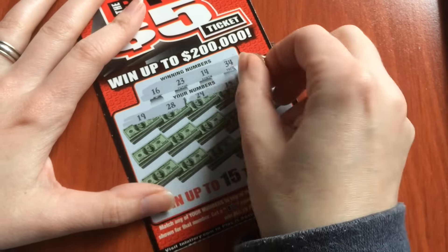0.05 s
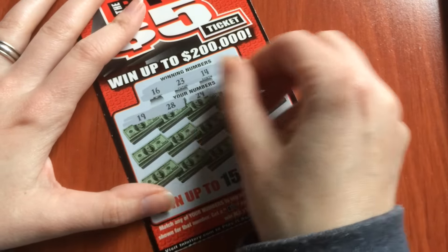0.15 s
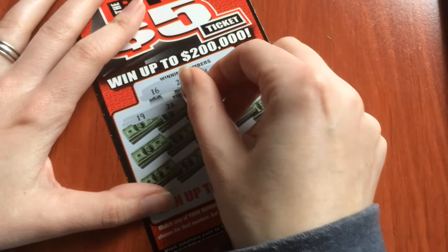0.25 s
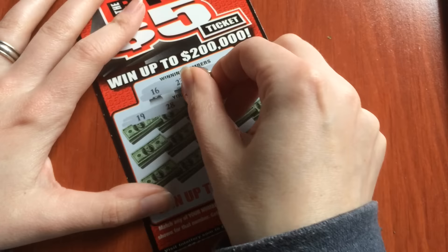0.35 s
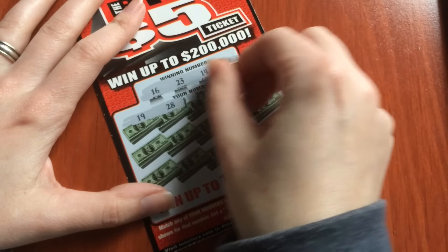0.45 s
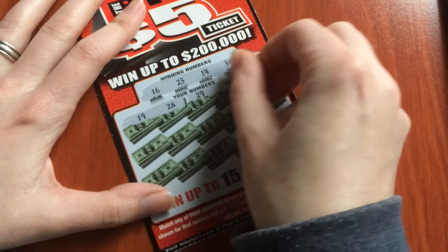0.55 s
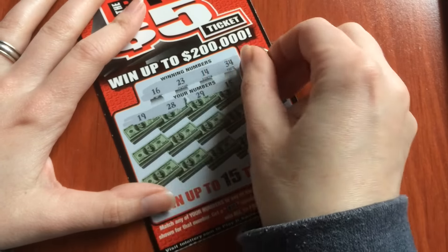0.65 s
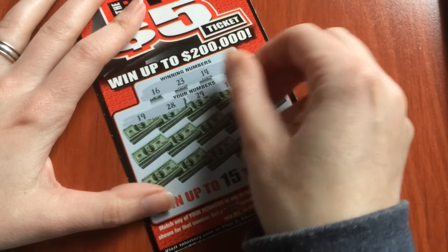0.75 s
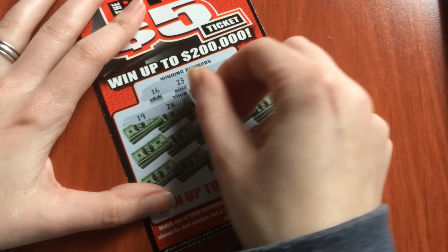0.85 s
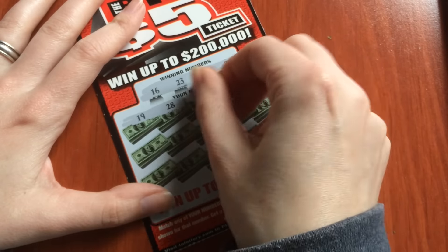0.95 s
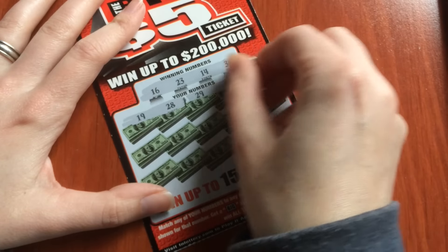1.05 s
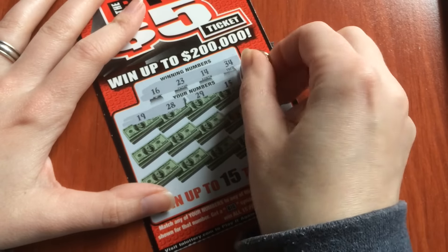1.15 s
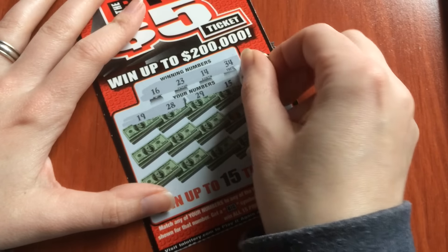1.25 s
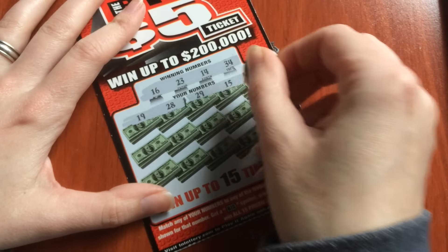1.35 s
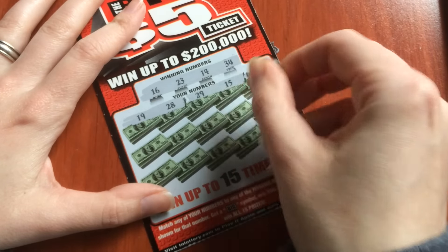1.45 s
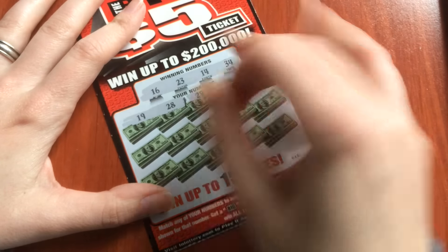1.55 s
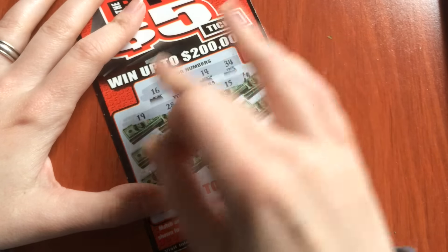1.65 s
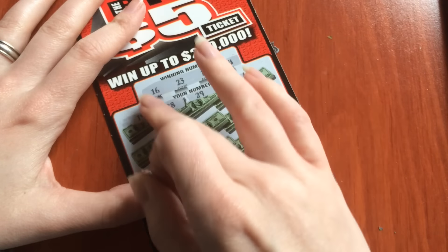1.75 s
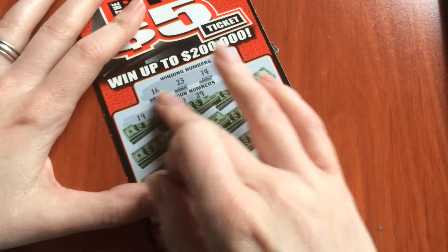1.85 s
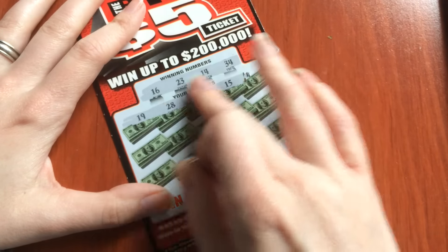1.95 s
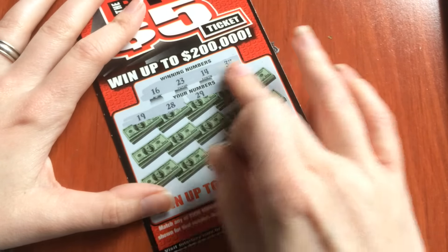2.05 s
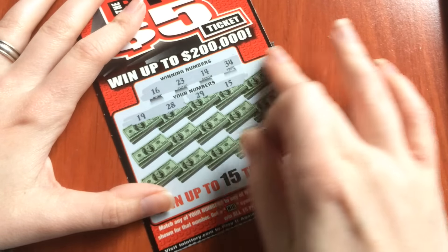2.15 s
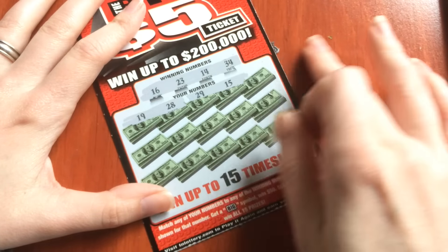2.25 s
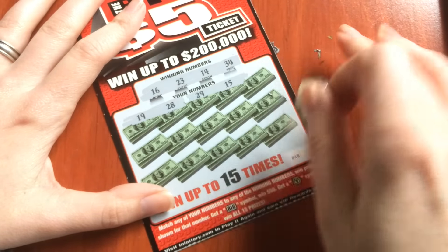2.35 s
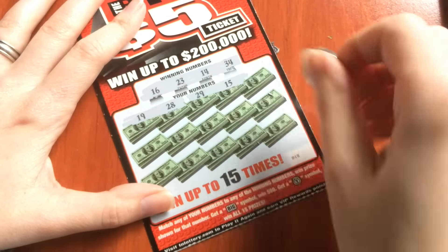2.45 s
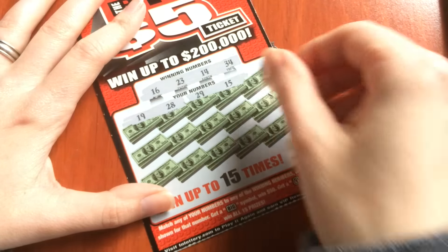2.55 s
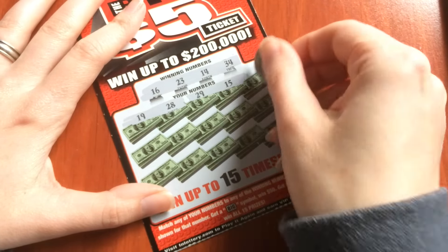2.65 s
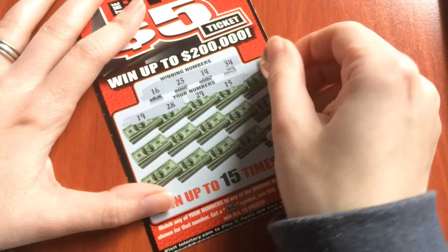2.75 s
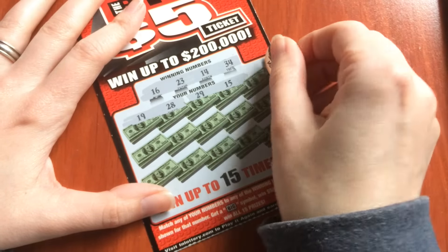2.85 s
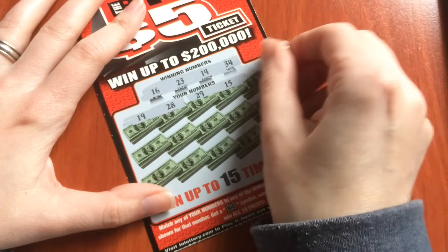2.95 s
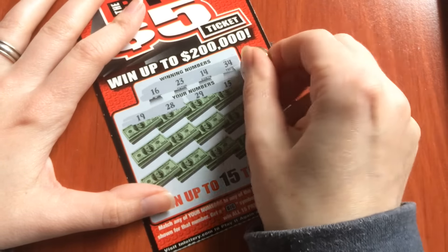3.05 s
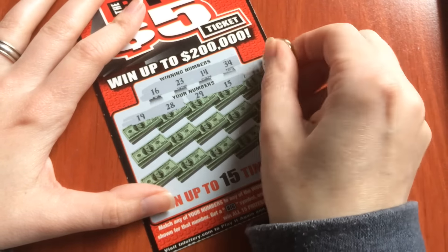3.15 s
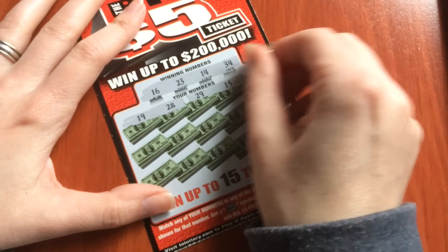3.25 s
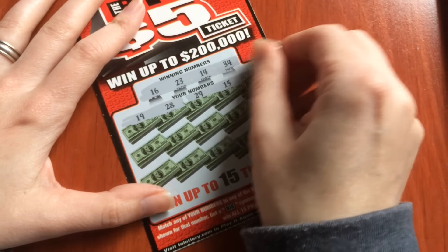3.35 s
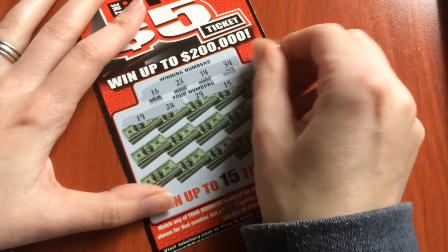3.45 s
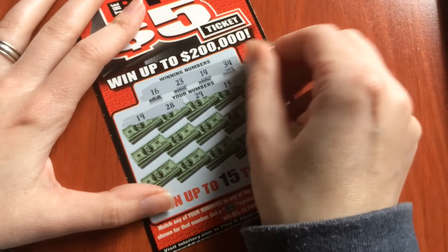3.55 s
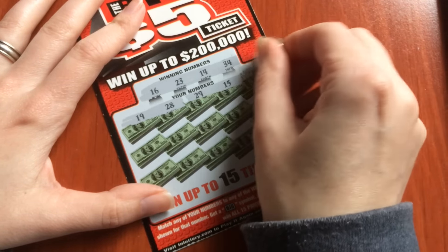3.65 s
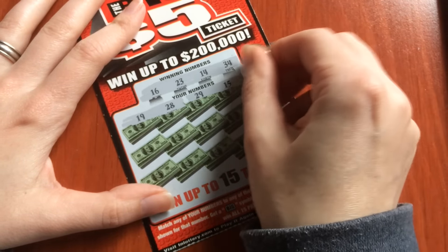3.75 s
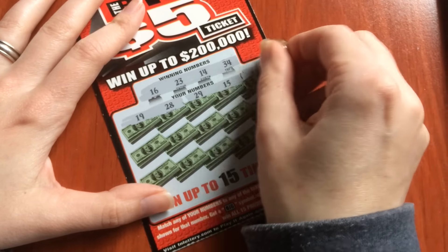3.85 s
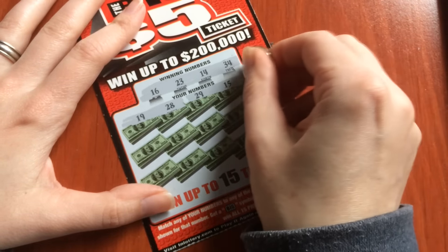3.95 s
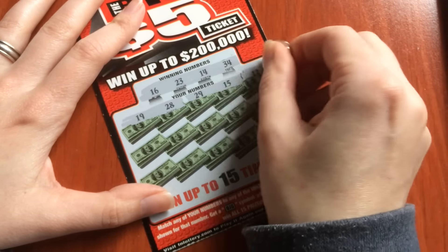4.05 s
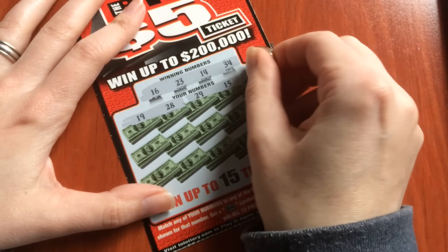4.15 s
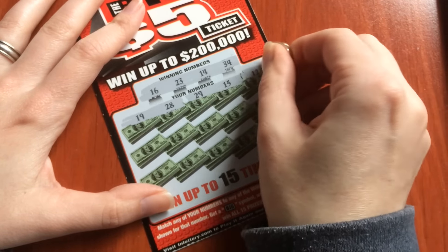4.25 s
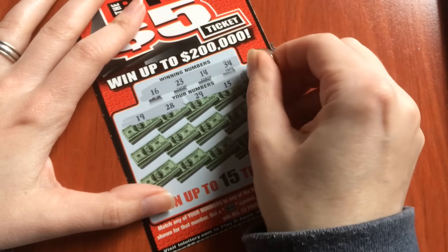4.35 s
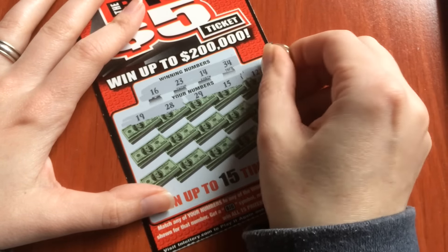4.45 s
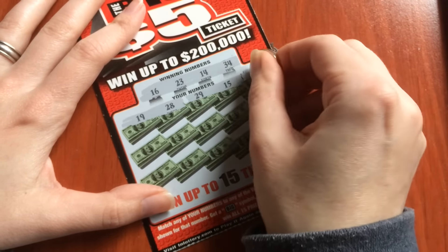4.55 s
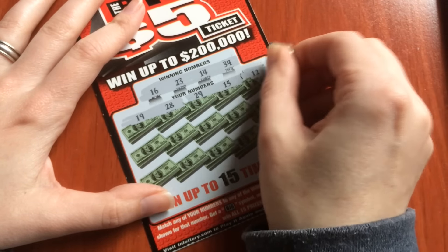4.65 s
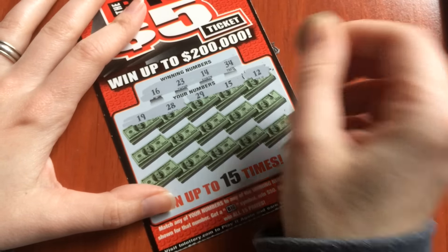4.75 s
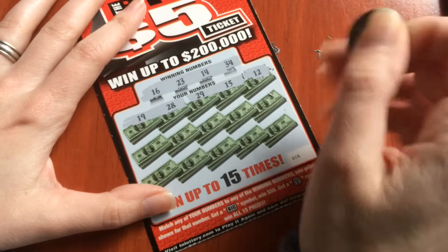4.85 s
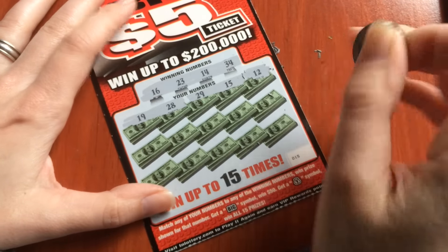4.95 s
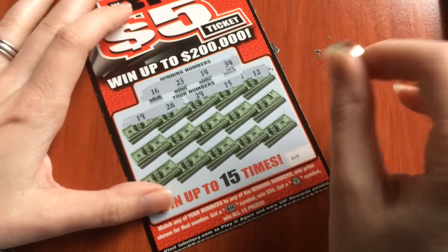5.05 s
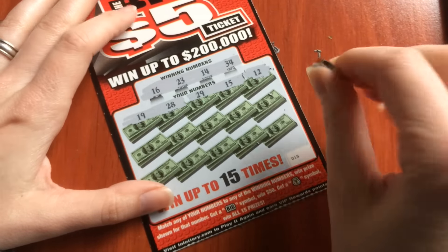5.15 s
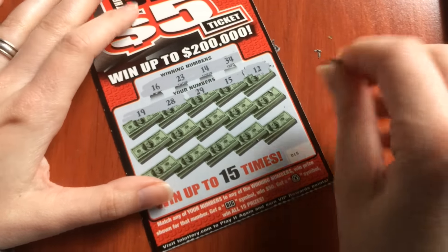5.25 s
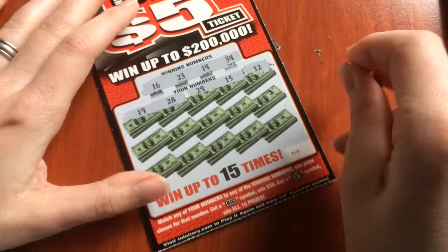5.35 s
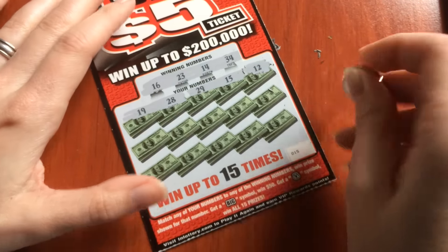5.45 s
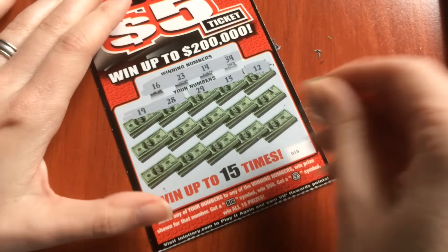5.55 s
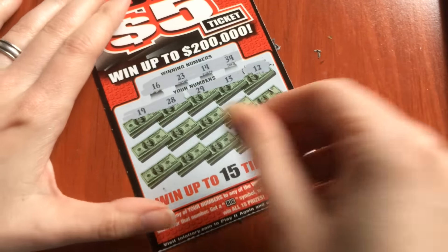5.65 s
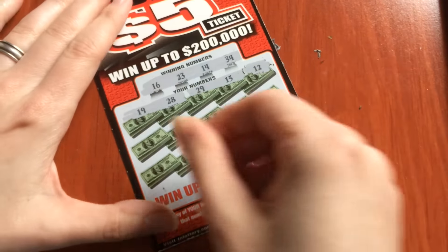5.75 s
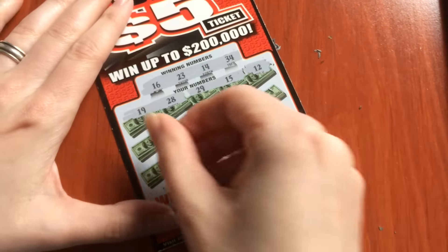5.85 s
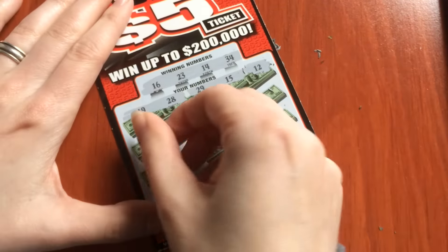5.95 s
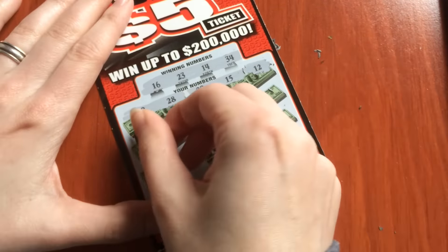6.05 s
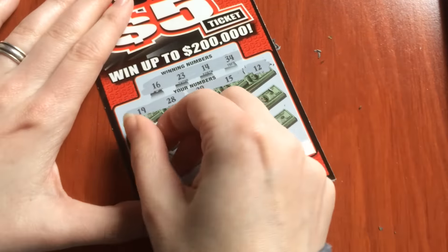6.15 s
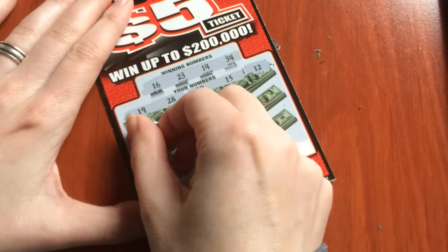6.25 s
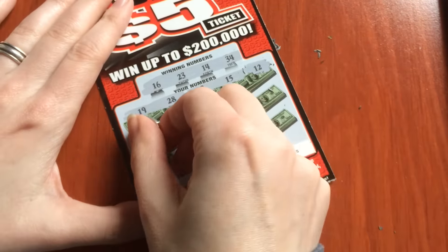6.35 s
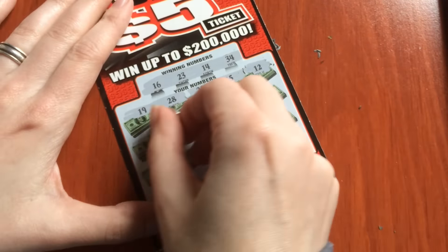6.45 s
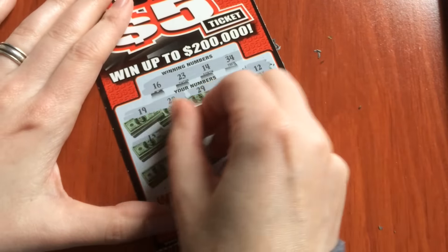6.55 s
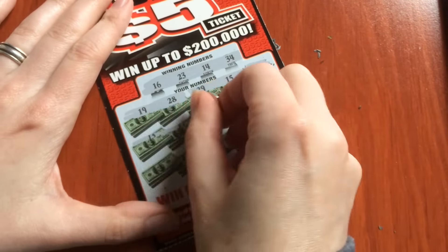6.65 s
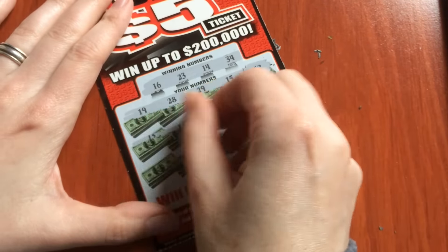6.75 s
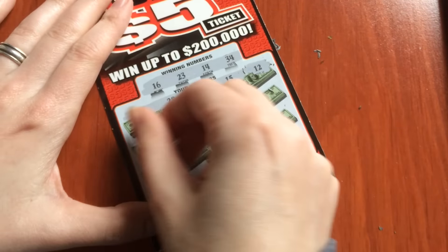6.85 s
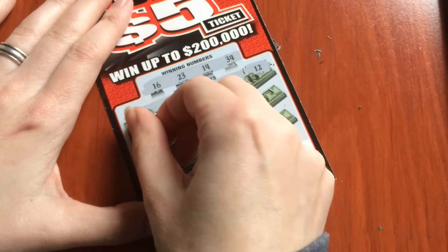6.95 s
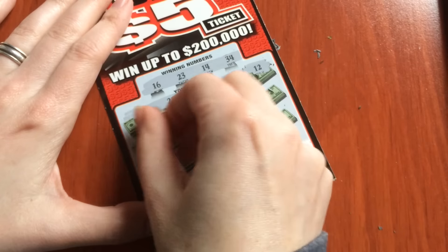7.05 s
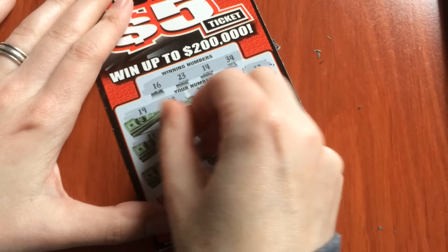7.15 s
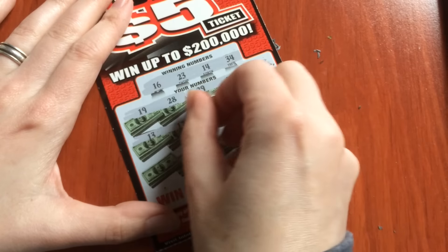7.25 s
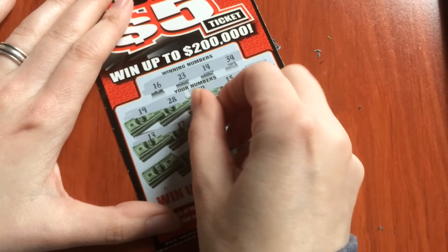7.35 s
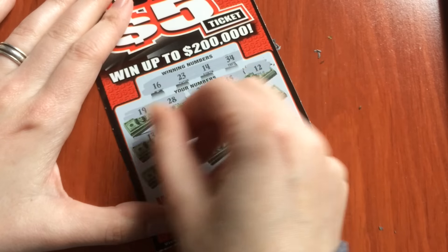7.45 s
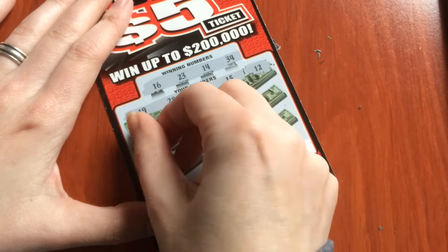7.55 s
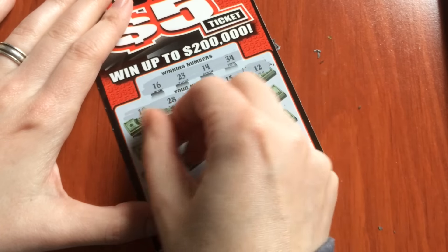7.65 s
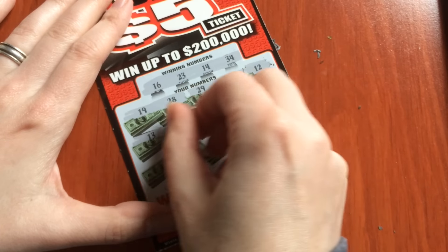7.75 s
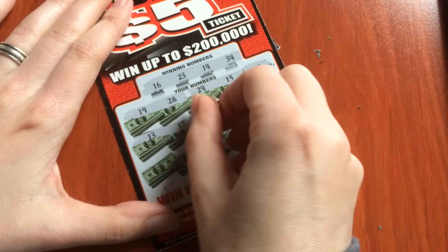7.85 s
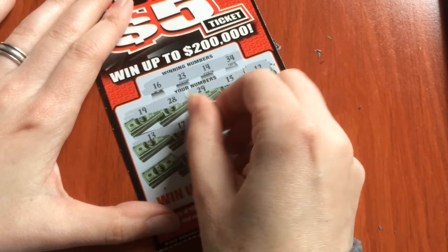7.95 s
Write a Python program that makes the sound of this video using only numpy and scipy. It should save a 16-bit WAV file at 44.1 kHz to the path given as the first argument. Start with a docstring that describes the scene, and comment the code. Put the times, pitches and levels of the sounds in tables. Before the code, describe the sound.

Dry, grainy scratching heard from very near: separate coin strokes on thin card, resonating in the wooden table beneath. Fingers softly sweep crumbs away with tiny nail ticks, then about sixteen rapid alternating strokes run together for under two seconds. Light clicks and a soft thump lead to three slower, brighter scrapes. The short dull echo of a furnished room and a faint wavering rumble surround it.

```python
"""A coin's edge scratches the coating off a card ticket on a wooden table by stick-slip friction: three slow
strokes, a quick back-and-forth run, then three more slow strokes. Random fractures of the coating, filtered into
bands, excite the resonances of table, card and coin. Filtered impulses make the knocks, noise bursts and damped
sines the light ticks, shaped grain noise the brushing fingers, and band noise the rub of the heel of the hand.
Decaying noise forms the room's short echo; coloured noise forms its quiet rumble."""
import sys
import numpy as np
from scipy import signal
from scipy.fft import rfft, irfft, next_fast_len
from scipy.io import wavfile
from scipy.ndimage import map_coordinates

SR = 44100
rng = np.random.default_rng(int(sys.argv[2]) if len(sys.argv) > 2 else 0)


def store_wav(level_fs):
    """Save 16-bit WAV to argv[1]."""
    pcm = np.round(np.clip(np.atleast_2d(level_fs), -1, 1) * 32767)
    wavfile.write(sys.argv[1], SR, pcm.T.astype(np.int16))


N = 353505
TIME = np.arange(N) / SR  # seconds

# Slow strokes of the coin. Each row: row of the ticket, start in s, fastest moment in s, end in s, attack in s,
# release in s, level in dB, then drag (bass), bite (treble) and hiss (top) at full speed, in dB relative to
# the middle band, and swell (rise in level towards the fastest moment) in dB.
SLOW_STROKES = [("top", -0.12, 0.011, 0.17, 0.02, 0.062, -39.5, -10.5, -0.56, -19.5, 1.7),
                ("top", 0.491, 0.52, 0.772, 0.0084, 0.073, -40.5, -10.5, 1.4, -19, 6.1),
                ("top", 1.059, 1.145, 1.303, 0.028, 0.043, -48.5, -9, -10.5, -29, 8.3),
                ("lower", 6.488, 6.62, 6.815, 0.0029, 0.087, -39, -12.5, 4.4, -16.5, 0),
                ("lower", 7.125, 7.3, 7.448, 0.025, 0.064, -42.5, -10, 3.1, -17.5, 0.56),
                ("lower", 7.73, 7.925, 8.04, 0.039, 0.074, -38, -12.5, -3.2, -21.5, 11.6)]
# Places where a slow stroke skids over a thin patch (quieter) or catches on a thick one (louder).
# Each row: centre in s, half length in s, change of level in dB, change of bite and hiss in dB.
COATING_PATCHES = [(0.518, 0.013, 1.5, 1.5), (0.635, 0.018, -3.5, 2), (1.135, 0.02, 3.5, -2),
                   (6.601, 0.021, -7, -5), (6.744, 0.015, 3, -5.5), (7.405, 0.011, 7, -9.5),
                   (7.858, 0.018, -4.5, 2.5)]
# Quick strokes at the corner, dull pushes and bright pulls in turn. Each row: start in s, fastest moment in s,
# end in s, level in dB, drag in dB and hiss in dB, both relative to the middle band.
QUICK_STROKES = [(3.053, 3.073, 3.178, -36.3, -7.5, -23), (3.194, 3.228, 3.26, -37, -12, -25),
                 (3.315, 3.368, 3.406, -37, -5.5, -25), (3.439, 3.481, 3.516, -40, -13, -26.5),
                 (3.537, 3.6, 3.635, -40, -3.5, -22), (3.656, 3.716, 3.73, -46.5, -8, -33),
                 (3.764, 3.808, 3.842, -40, -0.5, -39), (3.875, 3.893, 3.947, -46, -10.5, -35),
                 (3.972, 4.016, 4.05, -39.5, -0.5, -33), (4.079, 4.121, 4.15, -38, -13.5, -23.5),
                 (4.186, 4.204, 4.25, -39.5, -0.5, -33), (4.292, 4.317, 4.362, -38.5, -13, -26.5),
                 (4.394, 4.446, 4.474, -41.5, -3.5, -23.5), (4.505, 4.532, 4.57, -37, -10, -25),
                 (4.6, 4.634, 4.67, -44, 0, -26), (4.7, 4.726, 4.779, -42.5, -11, -28)]
# Ringing of the wooden table top. Each row: frequency in Hz, width in Hz before the hand's damping is added,
# then level in dB with the coin on the top row, at the corner and on the lower row.
WOOD_MODES = [(208, 33, -16, -16, -14), (343, 50, -20, -16, -16), (458, 18, -13, -5, -11),
              (494, 25, -17, -13, -15), (600, 47, -11, -6, -12), (728, 54, -15, -8, -16),
              (800, 54, -20, -24, -13), (948, 54, -16, -13, -14), (1087, 54, -6, 0, -10),
              (1164, 54, -20, -17, -10), (1265, 35, -9, -5, -10), (1430, 54, -3, -5, 0),
              (1462, 22, -1, -7, -2), (1567, 40, 0, -7, -4), (1663, 30, -7, -9, -7),
              (1722, 37, -4, -27, -4), (1787, 30, -6, -12, -16), (1849, 54, -10, -17, -4)]
# Higher resonances of the card and the pinched coin. Each row: the same columns as for the wood.
CARD_MODES = [(2002, 65, -9, -19, -4), (2108, 45, -5.5, -14, -22), (2185, 52, -15, -55, -5.5),
              (2350, 83, -5.5, -17, -3.5), (2520, 103, -10.5, -18, -29), (2673, 114, -10, -41, -3.5),
              (2880, 97, -14.5, -28, -4), (3017, 85, -21, -20.5, -6.5), (3226, 83, -19, -40, -7.5),
              (3470, 260, -19, -31.5, -17), (3817, 225, -16.5, -28.5, -14), (4330, 175, -24, -29.5, -16),
              (4520, 104, -29, -35, -15.5), (4991, 87, -25.5, -38, -21.5), (5474, 170, -31, -34.5, -24),
              (6300, 540, -32, -41.5, -28.5), (7520, 630, -35.5, -46, -32), (8240, 750, -34.5, -52, -29),
              (9070, 415, -42, -44.5, -41), (9700, 550, -35, -49, -39), (11000, 1200, -42, -43.5, -35),
              (12900, 1300, -47, -55, -35.5), (14400, 994, -41, -51, -41)]
# Landings of coin or fingers on the card. Each row: time in s, peak level in dB, contact cut-off in Hz,
# settling time constant in s.
KNOCKS = [(0.216, -51, 850, 0.021), (0.351, -53, 1000, 0.014), (0.3749, -25, 700, 0.0026),
          (0.803, -53.5, 453, 0.0097), (0.989, -28, 726, 0.0022), (2.166, -60, 597, 0.014),
          (2.905, -53, 414, 0.018), (6.235, -44, 397, 0.024), (6.845, -53, 460, 0.008),
          (6.999, -54.5, 382, 0.0071), (7.041, -38, 350, 0.01), (7.634, -49, 377, .03)]
# Light contacts of coin edge and nails. Each row: time in s, peak level in dB, ping frequency in Hz,
# ping level in dB relative to the crack.
TICKS = [(0.374, -45.5, 5440, -9), (0.9888, -44, 5860, -21), (1.8805, -46, 6800, 2),
         (2.004, -45, 5000, -13), (2.167, -37, 11400, -5), (2.177, -37, 2620, -2.5),
         (2.723, -52.5, 6030, -7), (2.874, -45.5, 6900, -19), (5.0206, -41, 8170, 2),
         (5.1491, -51, 7000, -16), (5.21, -52, 7000, -16), (5.434, -43, 4100, -1), (6.222, -38, 5600, -11),
         (7.0375, -36, 6750, -5), (7.626, -44.5, 8600, -6)]
# Fingers sweeping over the card. Each row: start in s, fastest moment in s, end in s, level in dB,
# pressure (body relative to the light hiss) in dB.
FINGER_SWEEPS = [(1.864, 2.16, 2.39, -62, -13), (1.993, 2.017, 2.16, -59.5, -1),
                 (2.154, 2.172, 2.305, -55, -7.5), (2.48, 2.568, 2.7, -76.5, -13),
                 (4.86, 4.92, 4.99, -67.5, -12), (5.68, 5.744, 5.82, -73, -17)]
# Spectrum of lightly sliding skin. Each row: frequency in Hz, density in dB per Hz.
LIGHT_SKIN_SPECTRUM = [(2500, -21), (5000, -11), (8000, -4), (12500, 1), (15500, -3.5)]
# Spectrum of pressed skin. Each row: frequency in Hz, density in dB per Hz.
PRESSED_SKIN_SPECTRUM = [(400, -3), (1400, -4), (2300, -4), (3700, 2), (6000, -2.5), (10000, -9)]
# Slides of the heel of the hand. Each row: start in s, fastest moment in s, end in s, level in dB.
HEEL_SLIDES = [(-0.06, 0.04, 0.15, -65), (7.73, 7.94, 8.07, -56)]
# Band of the heel's low rub: lower edge in Hz, upper edge in Hz.
HEEL_BAND_HZ = (125, 230)
# Spectrum of the room's background. Each row: frequency in Hz, density in dB per Hz.
ROOM_SPECTRUM = [(15, -49), (25, -14.5), (49, -3.5), (115, -2), (176, -8), (219, -4), (301, -12),
                 (404, -16), (438, -17), (749, -24.5), (952, -23.5), (1030, -26.5), (1310, -27),
                 (3540, -32.5), (15000, -37)]
# Slow change of the room's rumble. Each row: time in s, relative level in dB.
RUMBLE_LEVEL = [(0, -0.5), (1.6, 0), (2.65, 2.5), (3.5, -1.5), (4.3, 1.5), (5.2, -2), (6.6, -1.5),
                (7.3, -1), (8, 1.5)]


def slow_strokes(response, row, crumbs, release_curve=2.04, bite_rise_db=7.5, hiss_rise_db=4,
                 drag_rise_db=-4, patch_drag=-0.6):
    """Speed-dependent friction: the coin grips, rasps brighter with speed, crosses patches, slows and lifts."""
    strokes = [stroke[1:] for stroke in SLOW_STROKES if stroke[0] == row]
    controls = np.zeros((4, N))  # level, drag, bite and hiss in dB
    controls[0] = -160  # silence between strokes
    for start, fastest, end, attack_s, release_s, level_db, drag_db, bite_db, hiss_db, swell_db in strokes:
        on = (TIME > start) & (TIME < end)
        t = TIME[on]
        slack = 1 - arch(start, fastest, end)[on]  # 1 at rest, 0 at full speed
        attack = np.minimum((t - start) / attack_s, 1)
        release = np.minimum((end - t) / release_s, 1) ** release_curve
        grip_db = 20 * np.log10(attack * release)
        patch_db, patch_bite_db = np.zeros((2, len(t)))
        for centre, half_s, level_change_db, bite_change_db in COATING_PATCHES:
            bump = np.exp(-.5 * ((t - centre) / half_s) ** 2)
            patch_db += level_change_db * bump
            patch_bite_db += bite_change_db * bump
        controls[:, on] = [level_db + grip_db - swell_db * slack + patch_db,
                           drag_db - drag_rise_db * slack + patch_drag * patch_db,
                           bite_db - bite_rise_db * slack + patch_bite_db,
                           hiss_db - hiss_rise_db * slack + patch_bite_db]
    return scrape(response, crumbs, *controls)


def quick_strokes(response, push_power=1.13, pull_power=0.8, turn_db=-29, brighten=0.56, hiss_rise=0.22,
                  dig_db=2.5, creep_s=2.75, creep_db=-40.5, base_bite_db=-17, bite_per_drag=-0.71):
    """Reversing friction: the coin stays on the card; pulls reach their level sooner and hold it longer."""
    start, fastest, end, *columns = np.transpose(QUICK_STROKES)
    edges = np.column_stack([start, end]).ravel()
    columns.append(np.resize([push_power, pull_power], len(start)))
    level_db, drag_db, hiss_db, power = (np.interp(TIME, edges, np.repeat(c, 2)) for c in columns)
    speed = sum(arch(*row[:3]) for row in QUICK_STROKES)
    # the coin creeps on the card before the run and never falls silent at the turns
    touching = (TIME > creep_s) & (TIME < end[-1])
    resting = undb(np.where(TIME < start[0], creep_db, turn_db)) * touching
    speed_db = 20 * np.log10(np.abs(speed) ** power + resting + 1e-6)
    # crumbs pile up before the edge, so the treble comes late in a stroke
    pile_db = dig_db * np.interp(TIME, edges, np.tile([-1, 1], len(start)))
    # the more the coin drags, the less it bites
    bite_db = base_bite_db + bite_per_drag * drag_db + pile_db + brighten * speed_db
    moving_hiss_db = hiss_db + pile_db + hiss_rise * speed_db
    crumbs = grains(rate=7000, spread_db=2.5) * undb(1.08 * walk(220))
    return scrape(response, crumbs, level_db + speed_db, drag_db, bite_db, moving_hiss_db)


def scrape(response, crumbs, level_db, drag_db, bite_db, hiss_db, patchy_db=1, bend=0.0081):
    """Stick-slip excitation of a resonator: drag shakes the table, bite sharpens the rasp."""
    low_hz, mid_hz, high_hz = 900, 1900, 6000
    parts = [(band(crumbs, [185, low_hz], "bandpass", order=9), drag_db),
             (band(crumbs, [low_hz, mid_hz], "bandpass", order=5), 0),
             (band(crumbs, [mid_hz, high_hz], "bandpass", order=5), bite_db),
             (band(crumbs, high_hz, "highpass", order=5), hiss_db)]
    force = 0
    for part, part_db in parts:
        gain = undb(level_db + part_db + patchy_db * walk(45))
        # each band is levelled by how strongly it rings
        force = force + part * gain / ring(part, response).std()
    # the shifting pressure of the hand bends the resonances a little
    bent_s = band(np.cumsum(bend * walk(14)) / SR, 1.99, "highpass")
    return map_coordinates(ring(force, response), [(TIME + bent_s) * SR], order=3)


def grains(rate, spread_db):
    """Brittle fracture as a random impulse train (rate per second): many small breaks, a few large."""
    hit = rng.random(N) < rate / SR
    size = undb(spread_db * np.minimum(rng.exponential(size=N), 4))
    return unit(hit * size * rng.choice([-1, 1], N))


def table_response(modes, gains_db, hand_damping_hz=7):
    """Modal superposition: resonance powers add, and the cepstrum yields a minimum-phase impulse response."""
    size = 8192
    hz, width = np.transpose(modes)[:2]
    width = width + hand_damping_hz  # the resting hand damps every resonance
    detune = 2 * (np.fft.rfftfreq(size, 1 / SR)[:, None] - hz) / width
    shape = 1 / (1 + detune ** 2) / (1 + (detune / 8) ** 2)  # the far skirts fall faster
    power = shape @ undb(gains_db) ** 2
    cepstrum = irfft(np.log(power))[:size // 2]
    cepstrum[0] /= 2
    return irfft(np.exp(rfft(cepstrum, size)))[:size // 2]


def arch(start, fastest, end):
    """Kinematics of one stroke: speed rises sinusoidally from rest to 1 and returns to rest."""
    return np.sin(np.pi * np.interp(TIME, [start, fastest, end], [0, .5, 1]))


def knocks(response, rub_db=-23, rebound_s=0.00853, rebound_db=-12, damping_s=0.23):
    """Impact of a blunt body: a push, a rebound and a short settling rub on a table damped by the hand."""
    out, t = np.zeros(N), TIME[:len(response)]
    held = response * np.exp(-t / damping_s)
    for s, peak_db, cutoff_hz, settle_s in KNOCKS:
        force = undb(rub_db) * rng.standard_normal(len(t)) * np.exp(-t / settle_s)
        force[0] = 1
        force[int(rebound_s * SR)] += undb(rebound_db)
        thud = band(ring(force, held), cutoff_hz, "lowpass", order=3)
        add(out, s, band(thud, 310, "highpass"), peak_db)
    return out


def ticks(decay_s=0.00087, tail_s=0.0097, tail_db=-19, ping_s=0.001):
    """Impact of hard edges: a dry noise crack with a faint tail, and a quickly damped sine."""
    out, t = np.zeros(N), TIME[:SR // 20]
    for s, peak_db, hz, ping_db in TICKS:
        decay = np.exp(-t / decay_s) + undb(tail_db) * np.exp(-t / tail_s)
        crack = band(rng.standard_normal(len(t)) * decay, hz * .5, "highpass", order=3)
        ping = undb(ping_db) * np.sin(2 * np.pi * hz * t) * np.exp(-t / ping_s)
        add(out, s, crack + ping, peak_db)
    return out


def brush(speed_power=1.42):
    """Sliding friction of skin sweeping crumbs: hiss grows with speed and gains body under pressure."""
    light = coloured(grains(rate=18000, spread_db=4.5), LIGHT_SKIN_SPECTRUM)
    pressed = coloured(grains(rate=6700, spread_db=1.5), PRESSED_SKIN_SPECTRUM)
    light_power, pressed_power = 0, 0
    for start, fastest, end, level_db, pressure_db in FINGER_SWEEPS:
        gain = undb(level_db) * np.abs(arch(start, fastest, end)) ** speed_power
        # overlapping sweeps add in power
        light_power = light_power + gain ** 2
        pressed_power = pressed_power + (gain * undb(pressure_db)) ** 2
    return np.sqrt(light_power) * light + np.sqrt(pressed_power) * pressed


def heel():
    """Sliding friction of soft skin on wood: band noise murmurs in proportion to the hand's speed."""
    rub = unit(band(rng.standard_normal(N), HEEL_BAND_HZ, "bandpass", order=3))
    return rub * sum(undb(db) * arch(start, fastest, end) for start, fastest, end, db in HEEL_SLIDES)


def reflections(x, t60_s=0.13, wet_db=-13, damp_hz=5000):
    """Reverberation as exponentially decaying noise: the short dull echo of a furnished room."""
    t = TIME[:SR // 2]
    tail = rng.standard_normal(len(t)) * undb(-60 * t / t60_s) * (t > .005)  # first echo after 5 ms
    echo = band(tail / np.linalg.norm(tail), damp_hz, "lowpass", order=1)
    return undb(wet_db) * ring(x, echo)


def room_tone(level_db=-63.5, waver_db=1.2):
    """Stationary noise with a modulated low part: a wavering rumble under a smooth faint hiss."""
    noise = coloured(rng.standard_normal(N), ROOM_SPECTRUM)
    rumble = band(noise, 640, "lowpass", order=1)
    swell_db = np.interp(TIME, *np.transpose(RUMBLE_LEVEL)) + waver_db * walk(8.6)
    return undb(level_db) * (noise + rumble * (undb(swell_db) - 1))


def undb(db):
    """Logarithmic level: decibels to amplitude gain."""
    return 10 ** (np.asarray(db) / 20)


def unit(x):
    """Normalisation of effective value: scale to rms 1."""
    return x / np.sqrt(np.mean(x ** 2))


def band(x, hz, kind, order=2):
    """Frequency selection by a Butterworth filter."""
    sos = signal.butter(order, np.minimum(hz, .45 * SR), kind, fs=SR, output="sos")
    return signal.sosfilt(sos, x)


def ring(x, response):
    """Convolution: play a force through an impulse response."""
    return signal.oaconvolve(x, response)[:len(x)]


def add(out, s, x, db):
    """Superposition: mix in a short sound at time s with peak level db."""
    i = int(s * SR)
    out[i:i + len(x)] += (x * undb(db) / np.abs(x).max())[:N - i]


def coloured(x, points):
    """Spectral shaping: filter a noise by (Hz, dB) points on a logarithmic frequency axis, at rms 1."""
    size = next_fast_len(N)
    hz, db = np.transpose(points)
    freq = np.maximum(np.fft.rfftfreq(size, 1 / SR), 1)
    gain = undb(np.interp(np.log(freq), np.log(hz), db))
    return unit(irfft(rfft(x, size) * gain, size)[:N])


def walk(rate):
    """Slow random modulation: rate levels per second joined by straight lines, spread near 1."""
    return 1.2 * np.interp(TIME * rate, np.arange(N // 20), rng.standard_normal(N // 20))


def scene():
    """Superposition of all that the hand does on the table, heard close by in the room."""
    modes = np.vstack([WOOD_MODES, CARD_MODES])
    top, corner, lower = (table_response(modes, gains_db) for gains_db in modes.T[2:])
    top_crumbs = grains(rate=8000, spread_db=1.2) * undb(1.2 * walk(250))
    lower_crumbs = grains(rate=9000, spread_db=0.3) * undb(1.0 * walk(250))
    scratching = slow_strokes(top, "top", top_crumbs) + slow_strokes(lower, "lower", lower_crumbs)
    scratching = scratching + quick_strokes(corner)
    hand = scratching + knocks(corner) + ticks() + brush() + heel()
    return (hand + reflections(hand) + room_tone())[None]


def record(dry):
    """Band limiting: a steep elliptic low-pass cuts the top above 15450 Hz."""
    return signal.sosfilt(signal.ellip(10, .1, 70, 15450, fs=SR, output="sos"), dry)


dry = scene()
out = record(dry)
store_wav(out)
```